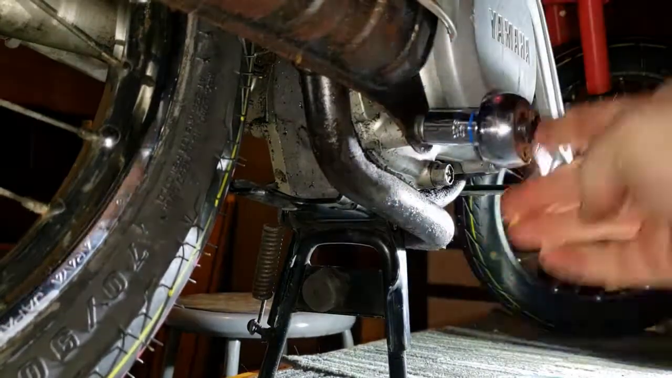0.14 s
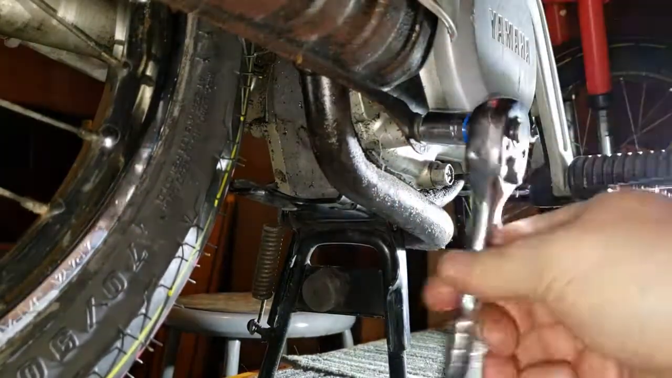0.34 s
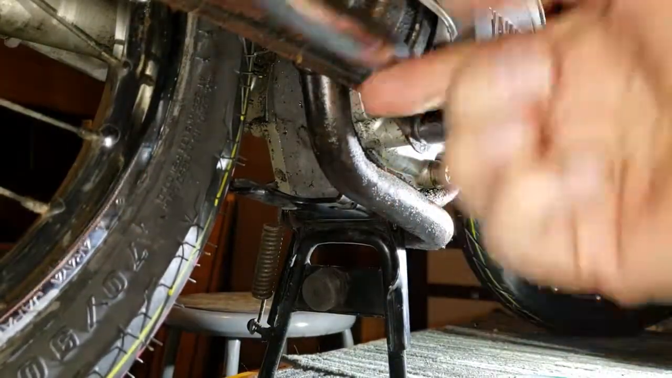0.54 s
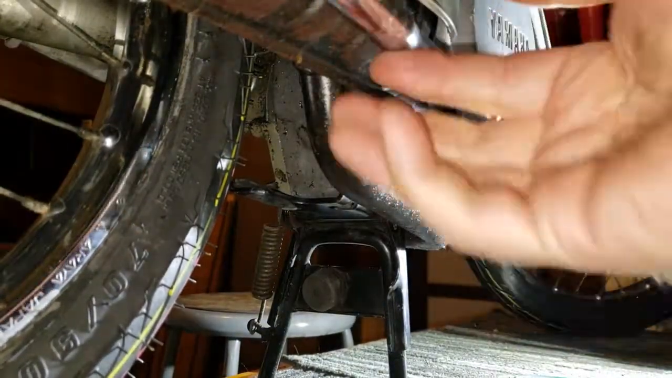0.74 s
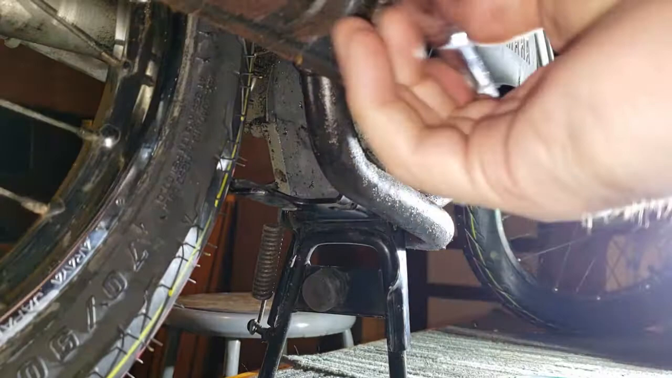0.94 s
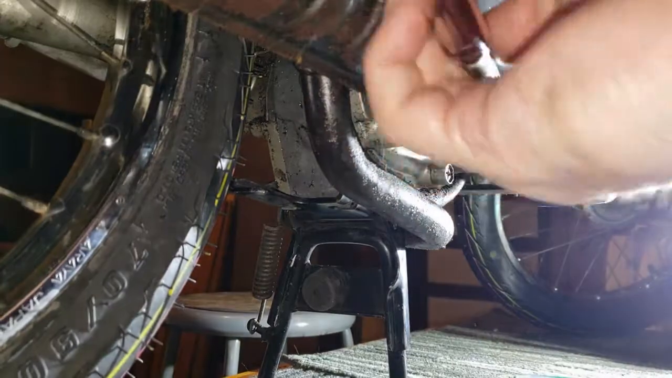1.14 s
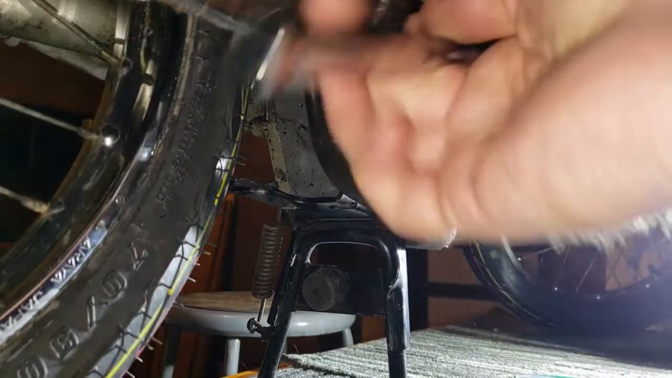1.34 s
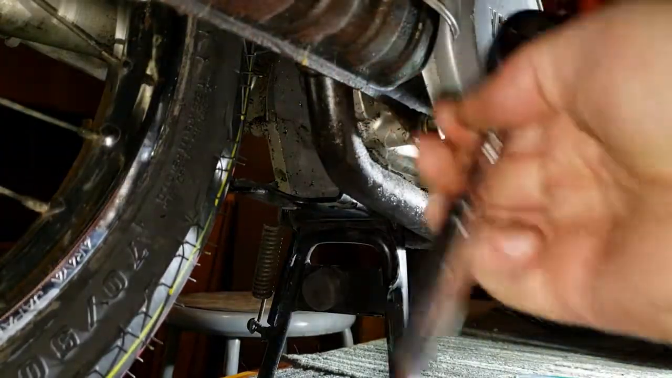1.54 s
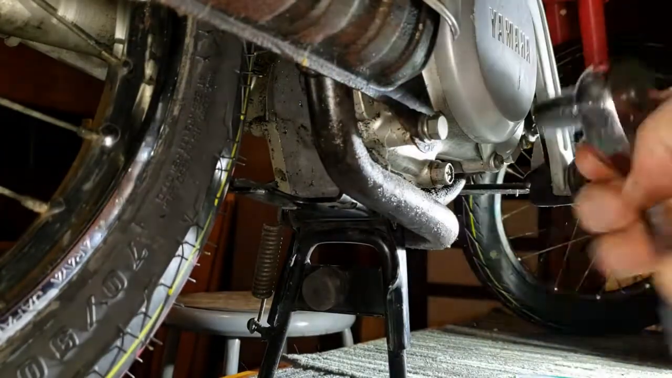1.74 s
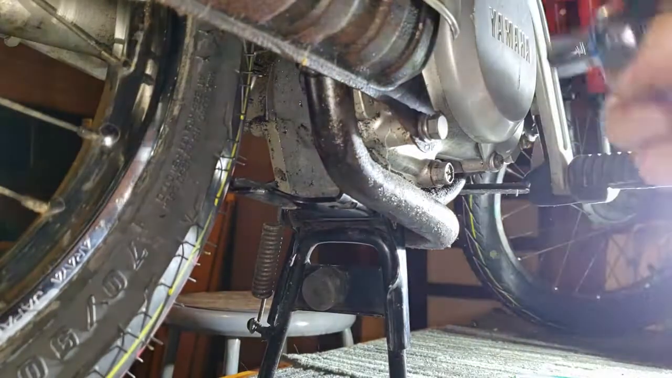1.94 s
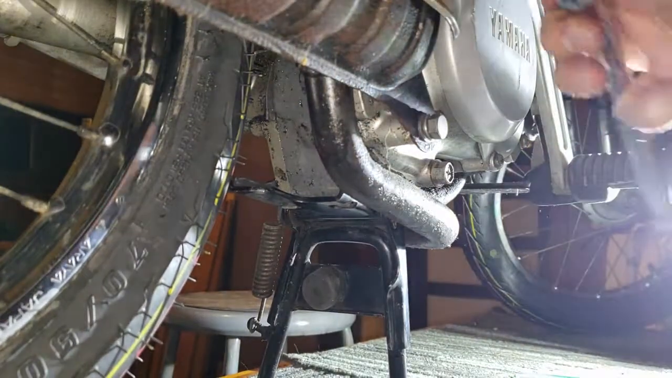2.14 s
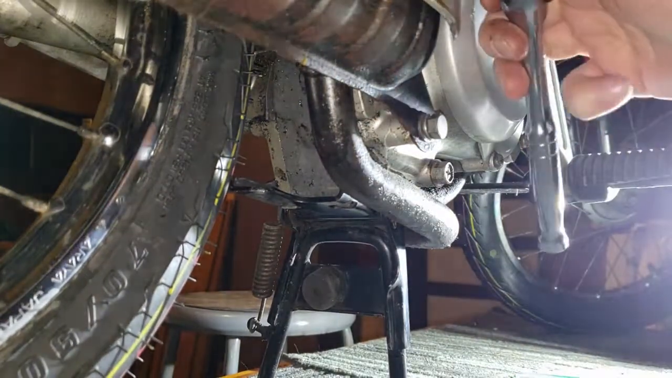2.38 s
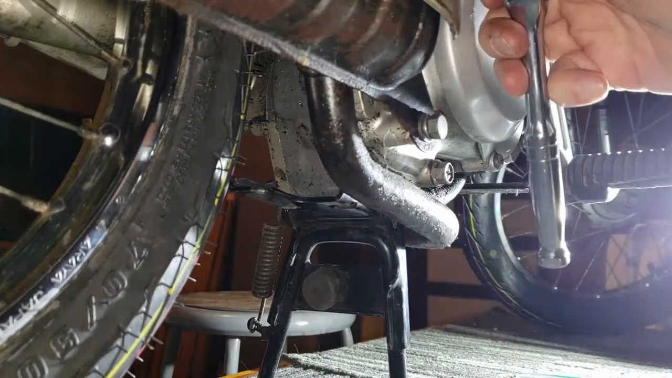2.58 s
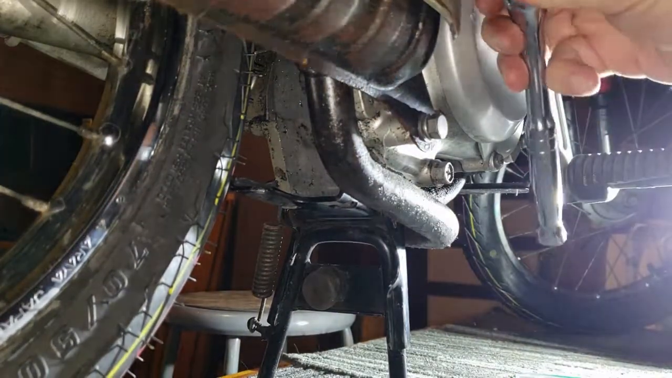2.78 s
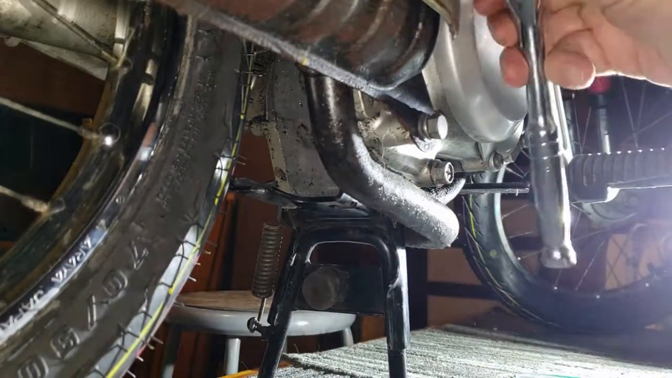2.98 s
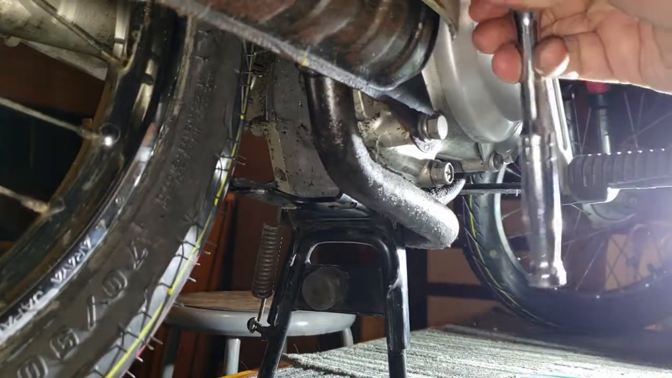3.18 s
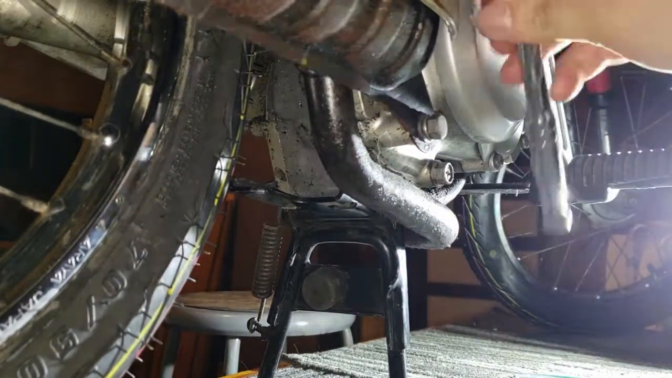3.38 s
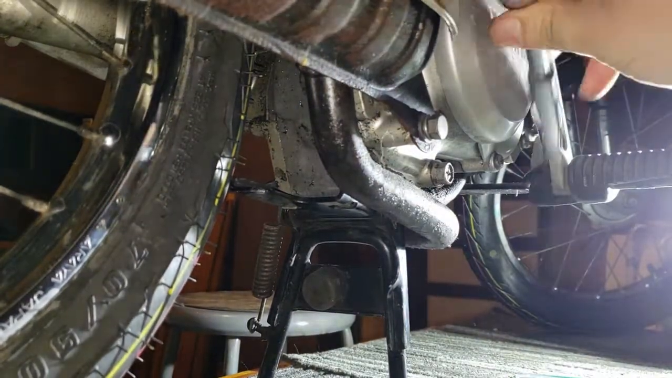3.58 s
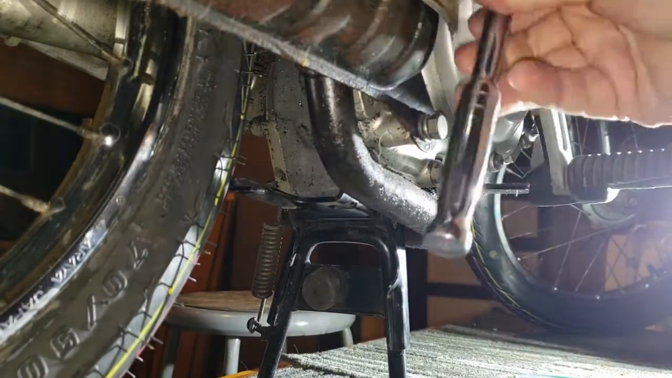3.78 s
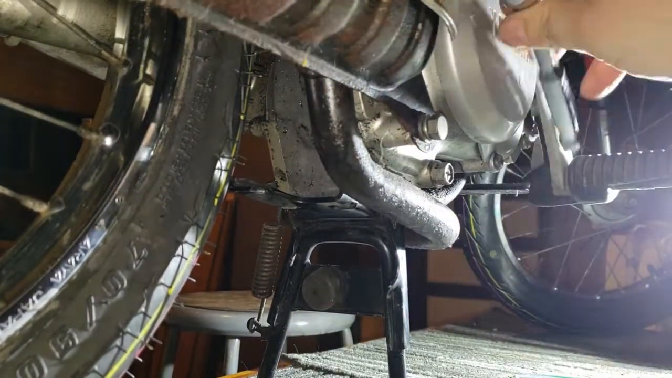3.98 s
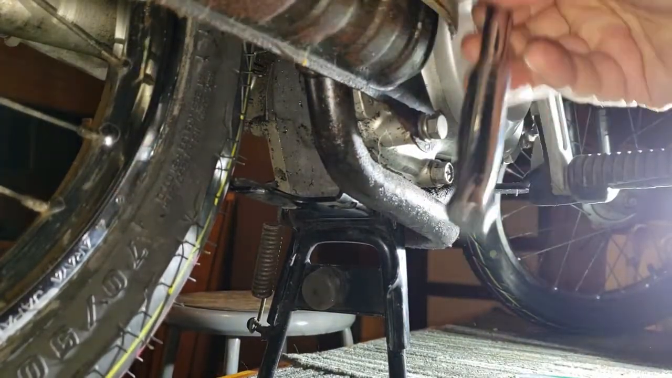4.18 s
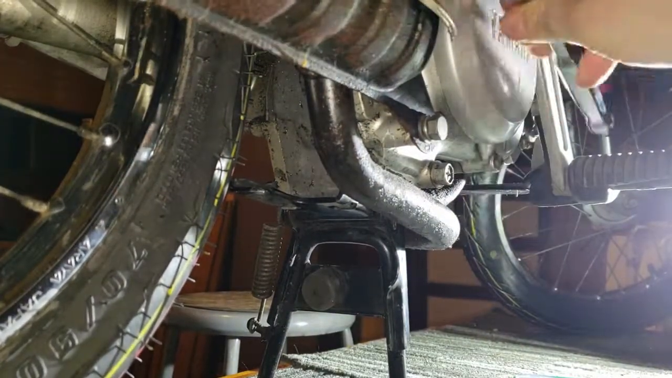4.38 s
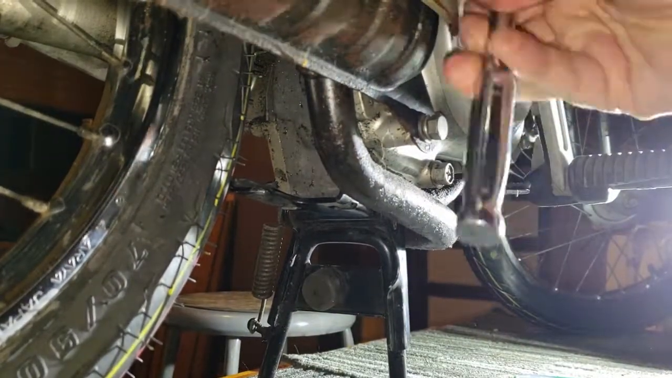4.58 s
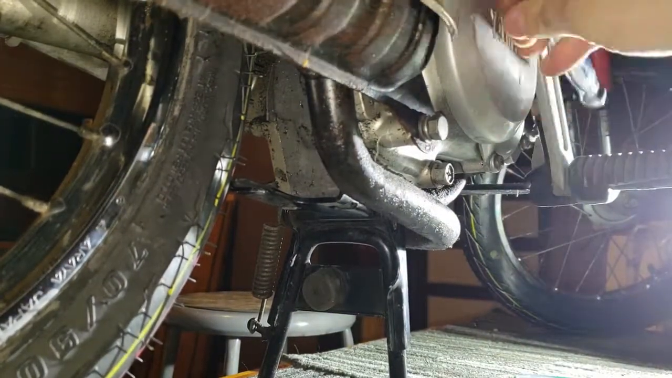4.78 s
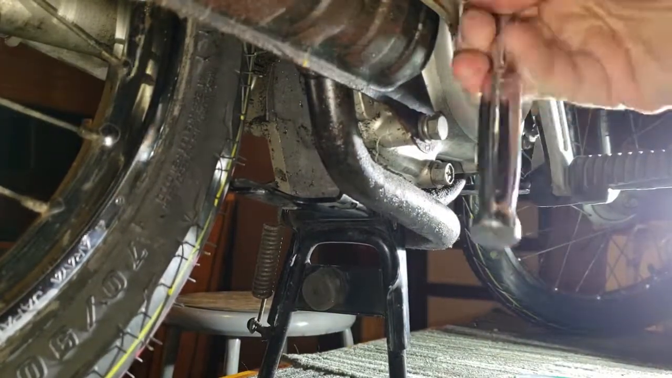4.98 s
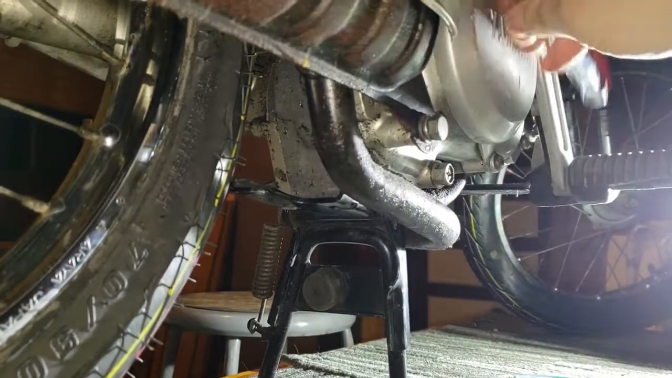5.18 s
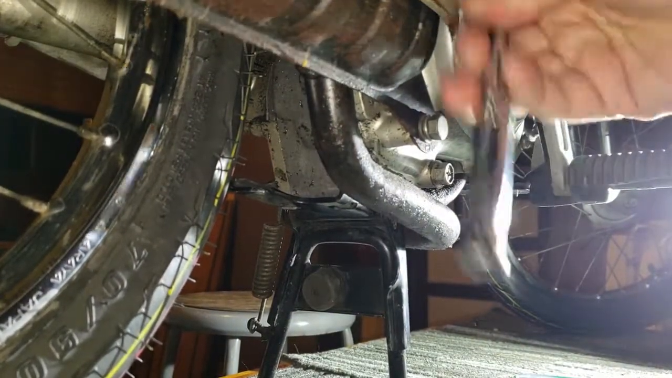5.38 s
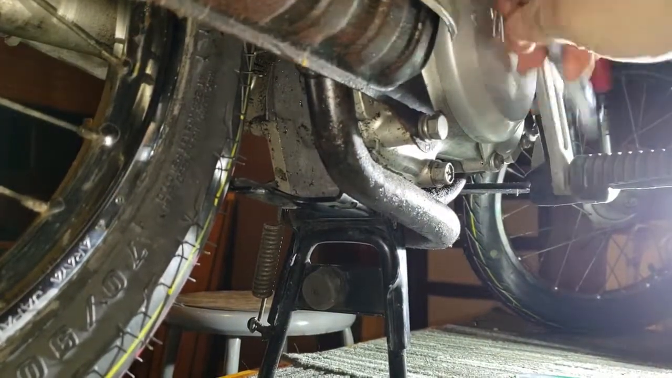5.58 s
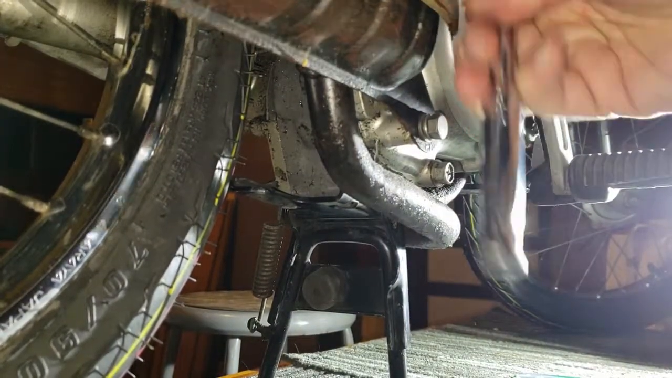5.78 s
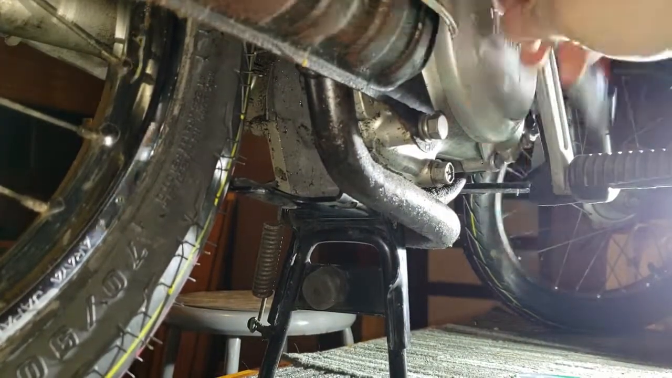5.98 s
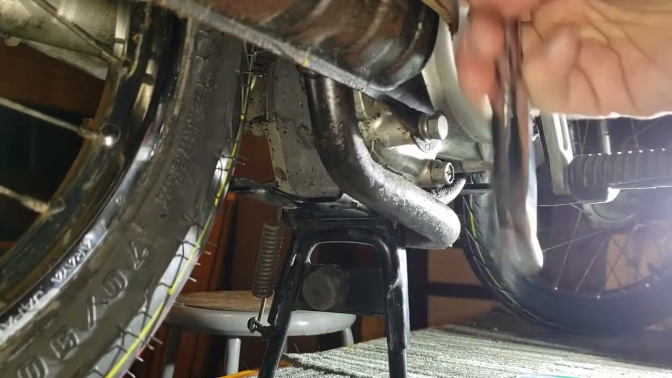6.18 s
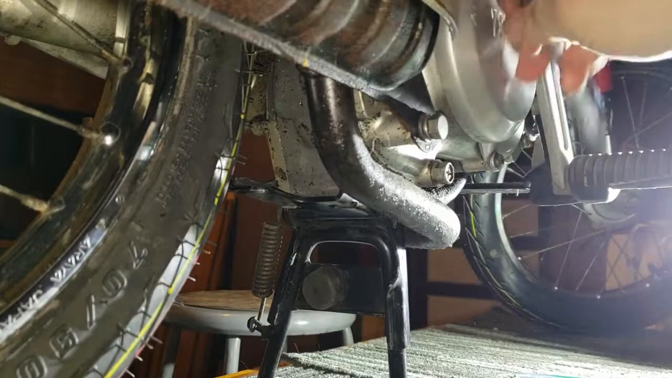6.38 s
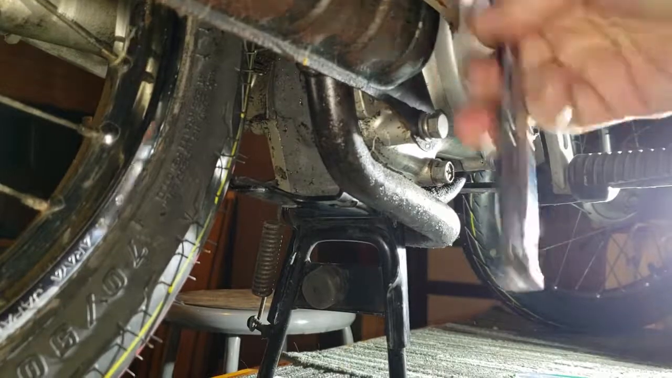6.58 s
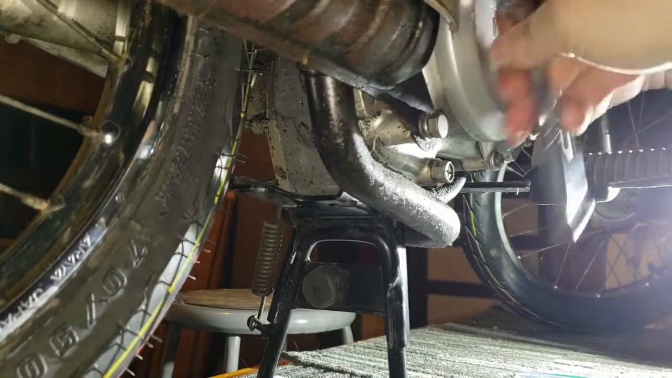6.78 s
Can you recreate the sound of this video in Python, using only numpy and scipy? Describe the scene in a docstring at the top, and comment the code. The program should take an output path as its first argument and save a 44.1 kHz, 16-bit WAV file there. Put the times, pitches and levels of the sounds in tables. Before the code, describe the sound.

Soft rumble and a low unsteady hum fill a small, briefly echoing room. First comes a tight cluster of hard metallic knocks, then a bright steel clank. After a few socket ticks and rubbing hisses, a lone ratchet click sounds, followed by nine crisp, evenly repeated clicking swings, close to the microphone, with one dull thud among them.

```python
"""Metal clatters against a moped in a small home workshop, over the room's rumble and a faint wavering hum.
A socket is rammed onto a ratchet with a clank; one lone click and nine bursts of clicking back-swings follow.
Rubbing hisses come from hand and pawl, and the socket ticks in its play on an engine bolt.
Contacts are short bursts of coloured noise, most with decaying modes of the struck metal under them.
Hum and drone are sines, rumble and rubbing are filtered noise, and an echo of noise is the room."""
import sys
import numpy as np
from scipy import signal
from scipy.fft import rfft, irfft, next_fast_len
from scipy.io import wavfile
from scipy.ndimage import uniform_filter1d

SR = 44100
rng = np.random.default_rng(int(sys.argv[2]) if len(sys.argv) > 2 else 0)


def persist_wave(psi):
    """Save psi, clipped to +-1, as 16-bit WAV."""
    counts = np.round(np.clip(psi, -1, 1) * 32767).astype(np.int16)
    wavfile.write(sys.argv[1], SR, np.atleast_2d(counts).T)


N = 301203


def from_db(db):
    """Decibels to gain."""
    return 10 ** (np.asarray(db) / 20)


def rms_one(x):
    """Scale to unit rms."""
    return x / np.sqrt(np.mean(x ** 2) + 1e-20)


def in_time(rows):
    """Each column of a curve at every sample."""
    s, *columns = np.transpose(rows)
    return [np.interp(np.arange(N) / SR, s, c) for c in columns]


def at_hz(points, hz, axis=1):
    """Read a column of a spectrum on a log-frequency axis."""
    points = np.array(points)
    return np.interp(np.log(hz + 1), np.log(points[:, 0]), points[:, axis])


def bins(size):
    """Frequencies of a spectrum of this many samples."""
    return np.arange(size // 2 + 1) * SR / size


def shelf(hz, corner_hz):
    """Smooth step in frequency: 0 well below the corner, 1 well above."""
    return hz ** 4 / (hz ** 4 + corner_hz ** 4)


def noise(level_db, size, alike=0, lag_ms=0):
    """Coloured stereo noise of unit rms; its shared part reaches the right ear lag_ms later."""
    shared, *own = rfft(rng.standard_normal((3, size)))
    delay = np.exp(-2j * np.pi * bins(size) * np.array([[0], [lag_ms]]) / 1000)
    both_ears = np.sqrt(alike) * shared * delay
    each_ear = np.sqrt(1 - alike) * np.array(own)
    return rms_one(irfft((both_ears + each_ear) * from_db(level_db), size))


def ripple(size, count=40):
    """Random hills and valleys in a spectrum, in dB, so that each contact has its own tone."""
    knots_hz = np.linspace(0, SR / 2, count)
    return 2.5 * np.interp(bins(size), knots_hz, rng.standard_normal(count))


def blow(size, rise, t60):
    """Envelope of a contact: fast rise, exponential fall by 60 dB in t60 seconds."""
    t = np.arange(size) / SR
    return (1 - np.exp(-t / rise)) * np.exp(-np.log(1000) * t / t60)


SCATTER_DB = 1.8   # spread of each mode's strength from blow to blow


def ringing(modes, size, detune=0):
    """Struck modes with new strengths each blow, optional random detuning and a phase for each ear."""
    hz, level_db, t60 = np.transpose(modes)[:, :, None]
    t = np.arange(size) / SR
    hz = hz * (1 + detune * rng.standard_normal(hz.shape))
    strength = from_db(level_db + SCATTER_DB * rng.standard_normal(hz.shape))
    decay = strength * np.exp(-np.log(1000) * t / t60)
    # long waves reach both ears in step
    apart = 0.29 * shelf(hz.T, 900) * rng.standard_normal((2, len(hz)))
    phase = np.exp(2j * np.pi * (rng.random(len(hz)) + apart))
    modes_sum = (phase @ (decay * np.exp(2j * np.pi * hz * t))).real
    return modes_sum * (1 - np.exp(-t / 0.0002))


def add(out, s, sound):
    """Mix a sound in at time s."""
    i = round(s * SR)
    out[:, i:i + sound.shape[1]] += sound[:, :max(N - i, 0)]


def pan(db):
    """Gains for a left-minus-right level difference."""
    return from_db(np.array([[db], [-db]]) / 2)


# rumble's movement, before trim: [t/s, deep level/dB, upper level/dB]
RUMBLE_MOVES = [(0, -53, -54), (.5, -56.5, -55), (1.05, -60, -58), (1.9, -64.5, -59), (2.4, -64, -59),
                (2.9, -56.5, -55.5), (3.15, -57, -52.5), (4.35, -56.5, -57), (5.25, -59.5, -57.5),
                (6.83, -55.5, -56)]
# rumble's colour: [f/Hz, relative level/dB]
RUMBLE_COLOUR = [(22, -30), (40, -11), (90, -10.5), (160, -3), (260, -5), (449, -8), (640, -2.5),
                 (720, -10.5), (866, -9.5), (1050, -14), (1720, -23.5), (3310, -28), (6500, -35.5),
                 (16000, -37.5)]
# resonances in the rumble: [f/Hz, width/Hz, boost level/dB]
AIR_PEAKS = [(256, 30, 4.5), (546, 44, 2.5), (649.4, 98, 5)]
# left-right likeness of rumble and echo: [f/Hz, shared power 0-1]
LIKENESS = [(50, 0.76), (150, 0.97), (300, 0.82), (600, 0.45), (1200, 0), (16000, 0)]
# wavering hum: [t/s, f/Hz, rms level/dB]
HUM = [(0, 57.3, -66), (.6, 58.7, -61.5), (1.1, 52, -63), (3.2, 52.13, -62), (3.5, 55.7, -60.5),
       (3.9, 56.9, -68), (4.8, 59.9, -68), (5.35, 63, -63), (6.83, 65, -58.5)]
# steady drone: [f/Hz, rms level/dB]
DRONE = [(118, -77), (146, -77.5), (207, -73.5), (241, -66.5), (267, -81.5)]


def background():
    """Rumble with a few resonances, a steady drone and a low hum that wavers in pitch."""
    size = next_fast_len(N)
    hz, t = bins(size), np.arange(N) / SR
    colour = at_hz(RUMBLE_COLOUR, hz)
    for centre, width, boost_db in AIR_PEAKS:
        colour = colour + boost_db / (1 + (2 * (hz - centre) / width) ** 2)
    upper = shelf(hz, 330)
    rumble = 0
    for share, level_db, trim_db in zip((1 - upper, upper), in_time(RUMBLE_MOVES), (2.0, 2.5)):
        part = noise(colour + 10 * np.log10(share + 1e-9), size, alike=at_hz(LIKENESS, hz))
        rumble = rumble + part[:, :N] * from_db(level_db + trim_db)
    hum_hz, hum_db = in_time(HUM)
    hum = from_db(hum_db) * np.sin(2 * np.pi * np.cumsum(hum_hz) / SR)
    drone = sum(from_db(db) * np.sin(2 * np.pi * (line_hz * t + rng.random())) for line_hz, db in DRONE)
    return rumble * pan(.8) + np.sqrt(2) * (hum + drone)   # root two turns rms into sine peak


# workshop's echo by band: [f/Hz, level/dB, t60/s]
ECHO_BANDS = [(100, 1, 0.9), (250.5, 5, 0.42), (620, 2.5, 0.28), (1510, -5.5, 0.39), (4020, -5, 0.27),
              (9350, -14, .27), (15000, -10.5, .19)]


def workshop(dry, size=24000):
    """Dense echo of diffuse noise whose bass lingers longest and whose top dies first."""
    hz, echo = bins(size), 0
    diffuse = rfft(noise(0 * hz, size, alike=at_hz(LIKENESS, hz)))
    centres = np.array(ECHO_BANDS)[:, 0]
    for (_, level_db, t60), pick in zip(ECHO_BANDS, np.eye(len(ECHO_BANDS))):
        # each band fades into its neighbours
        band = irfft(diffuse * at_hz(np.c_[centres, pick], hz), size)
        tail = blow(size, rise=0.0035, t60=t60)
        echo = echo + from_db(level_db) * band * tail / np.linalg.norm(tail)
    return signal.fftconvolve(dry, echo, axes=1)[:, :N]


# rubbing hisses: hand on the tool, and the pawl's slow ride up a tooth before the lone click:
# [start t/s, end t/s, base level/dB]
RUBS = [(1.416, 1.473, -53), (1.976, 2.169, -63.5), (2.771, 2.931, -52), (2.941, 3.091, -57.5),
        (3.099, 3.183, -50.5)]
# hiss of rubbing: [f/Hz, relative level/dB]
RUB_COLOUR = [(400, -14), (1200, -2), (2400, -0.5), (5000, -4), (8000, -1.5), (13000, 3), (16000, -1.5)]
# the hand slides on the handle once shortly before each of the last swings: [base level/dB]
REGRIPS = [-55, -45, -50, -46, -44.5]
REGRIP_LEAD_S, REGRIP_S = 0.1, .062   # start ahead of the swing, length


def rubbing():
    """Surfaces rub, hand on tool or pawl on tooth: a soft hiss swells and fades, catching in tiny slips."""
    out = np.zeros((2, N))
    rubs = list(RUBS)
    for (swing_s, *_), level_db in zip(SWINGS[-len(REGRIPS):], REGRIPS):
        start = swing_s - REGRIP_LEAD_S
        rubs.append((start, start + REGRIP_S, level_db))
    for start, end, level_db in rubs:
        size = round((end - start) * SR)
        grain = rms_one(uniform_filter1d(rng.standard_normal(size), size=300))
        slips = (rng.random(size) < 70 / SR) * rng.random(size)   # about 70 a second
        catch = signal.fftconvolve(slips, blow(size, rise=0.000179, t60=0.018))[:size]
        swell = signal.windows.tukey(size, .7) * from_db(level_db + 1.2 * grain)
        hiss = noise(at_hz(RUB_COLOUR, bins(size)), size, alike=0.18)
        add(out, start, swell * (1 + 1.1 * catch) * hiss)
    return out * pan(-1.5)


# socket ticking in its play on the bolt: [t/s, level/dB before trim, treble level/dB relative]
TICKS = [(0.0356, -40.5, -28), (0.3106, -43, -27), (0.5276, -46, -49), (1.0253, -46, 1),
         (2.4607, -23.5, -3), (2.4843, -29.5, -21), (2.5825, -41, -40), (2.6553, -40.5, -37),
         (3.6634, -26, -44), (3.7395, -28.5, -28), (4.9704, -27.5, -3), (5.3535, -29, -18),
         (5.74, -33.5, -15), (6.2906, -33, -12), (6.6339, -35, -43), (6.6622, -36, -5)]
# tick's colour: [f/Hz, relative level/dB]
TICK_COLOUR = [(530, -46.5), (900, -12.5), (2120, -5.5), (3590, -9.5), (4150, -1.5), (7770, -4.5),
               (8550, -15), (9650, -13), (16000, -3)]
# modes of the ratchet head, also rung by its teeth: [f/Hz, relative level/dB, t60/s]
HEAD = [(1436, -29.5, 0.07), (2128, -24.5, 0.057), (2399, -21.5, 0.026), (4840, -18, 0.085),
        (5244, -15.5, 0.023), (9804, -6.5, 0.062), (9750, -14, 0.03), (15300, -12, 0.013)]


def ticks(size=4096):
    """Light steel-on-steel contacts: noise bursts with a trace of the head's ring."""
    out, hz = np.zeros((2, N)), bins(size)
    for s, level_db, treble_db in TICKS:
        colour = at_hz(TICK_COLOUR, hz) + treble_db * shelf(hz, 7700)
        tick = noise(colour, size, alike=0.3) * blow(size, rise=0.0009, t60=0.026)
        add(out, s, from_db(level_db - 4.5) * tick + from_db(level_db - 21.0) * ringing(HEAD, size))
    return out


# handle bumping its stop, one event: [t/s, level/dB]
BUMP = (3.8258, -30.5)
# dull colour of the thud: [f/Hz, relative level/dB]
THUD_COLOUR = [(60, -9), (190, 2), (300, -5), (430, -6), (590, 3), (880, -18), (1170, 6.5), (1400, -19.5),
               (2500, -16.5), (6000, -29.5), (16000, -52)]


def bump(size=8192):
    """The hand bumps the handle against its stop: a soft thud of dull, short-lived noise."""
    out = np.zeros((2, N))
    s, level_db = BUMP
    thud = noise(at_hz(THUD_COLOUR, bins(size)), size, alike=0.75) * blow(size, rise=0.00022, t60=0.076)
    add(out, s, from_db(level_db) * thud)
    return out


# tool knocking the moped:
# [t/s, level/dB before trim, bass level/dB, treble level/dB, crack t60/s, left-minus-right level/dB]
# the colour is left as it is by bass -15.5 and treble -10.5
KNOCKS = [(0.695, -6.5, -16, -10.5, 0.044, -2.5), (0.726, -6, -20, -18.5, 0.035, 3.5),
          (0.738, -4.5, -26, -10, 0.047, -1), (0.754, -12, -20.5, -6, 0.042, 1.0),
          (0.767, -16.5, -17, -7, 0.047, 4), (0.938, -31, -29, -21, 0.042, 1.5),
          (0.951, -41, -16.5, -18.5, 0.042, -8)]
# crack's colour: [f/Hz, relative level/dB]
KNOCK_COLOUR = [(35, -54.5), (60, -24), (139, -15), (417, -12), (458, -8.5), (540, -13.5), (1220, -6),
                (1470, -15), (2300, -3), (3040, -8.5), (4320, -8), (5090, -12.5), (6740, -14.5),
                (8920, -22), (16000, -16.5)]
# ring of the knocked metal: [f/Hz, relative level/dB, t60/s]
FRAME = [(125, -31.5, 0.15), (173, -22.5, 0.18), (392, -30, 0.27), (998, -25, 0.18), (1181, -21.5, .3),
         (1846, -21, .12), (2070, -29, .2), (2340, -20.5, 0.17), (2540, -18.5, 0.27), (2660, -24, 0.33),
         (2983, -27, 0.26), (3210, -26.5, .3), (3440, -21, .15), (3650, -27.5, .35), (4350, -19, 0.13),
         (4900, -20.5, 0.16), (7810, -28.5, 0.2)]


def knocks(size=16384):
    """The tool clatters: hard cracks with their own bass and treble, and the ring of frame and exhaust."""
    out, hz = np.zeros((2, N)), bins(size)
    for s, level_db, bass_db, treble_db, t60, side_db in KNOCKS:
        bass = (bass_db + 15.5) * (1 - shelf(hz, 1400))
        treble = (treble_db + 10.5) * shelf(hz, 4000)
        colour = at_hz(KNOCK_COLOUR, hz) + bass + treble
        crack = noise(colour, size, alike=1 - .5 * shelf(hz, 540), lag_ms=-.13)
        tail = from_db(-13.5) * blow(size, rise=.003, t60=0.14)
        crack = crack * (blow(size, rise=0.00052, t60=t60) + tail)
        ring = ringing(FRAME, size)
        add(out, s, pan(side_db) * (from_db(level_db - 2.5) * crack + from_db(level_db - 8.0) * ring))
    return out


# socket rammed home on the ratchet: [t/s, level/dB before trim, crack t60/s]
CLANKS = [(1.4962, -27.5, 0.015), (1.499, -7, 0.013), (1.5018, -10, 0.02)]
# crack's colour: [f/Hz, relative level/dB]
CLANK_COLOUR = [(100, -33), (500, -15), (850, -7.5), (1100, -5), (1350, -2.5), (1650, -0.5), (2500, 2.5),
                (3200, -12), (4500, -5), (5400, -6.5), (6000, -8.5), (8000, -13), (12000, -9.5),
                (16000, -11)]
# modes of socket and handle: [f/Hz, relative level/dB, t60/s]
SOCKET = [(130, -34, .3), (237.5, -30.5, 0.11), (290, -30.5, 0.24), (825, -37.5, .3), (1123, -12, 0.13),
          (1560, -13, 0.045), (1670, -27, 0.3), (1920, -9.5, 0.06), (2500, -15.5, 0.042), (4930, -24, 0.19),
          (5930, -9, .03), (9440, -16.5, 0.11), (9880, -23, 0.074)]


def clank(size=16384):
    """The socket touches, slams against its shoulder and rebounds: three cracks, each with a ring."""
    out, hz = np.zeros((2, N)), bins(size)
    for s, level_db, t60 in CLANKS:
        crack = noise(at_hz(CLANK_COLOUR, hz), size, alike=0.22, lag_ms=.27)
        crack = crack * blow(size, rise=0.00065, t60=t60)
        add(out, s, from_db(level_db + 3.0) * crack + from_db(level_db - 7.5) * ringing(SOCKET, size))
    return out * pan(3.0)


# a lone click, then back-swings of the handle:
# [start t/s, end t/s, teeth passed, arc share at first tooth 0-1, arc share at last tooth 0-1,
#  base level/dB, head's ring level/dB relative]
SWINGS = [(2.9, 2.9, 1, 0.25, .9, -14, -5), (3.4846, 3.645, 10, 0.11, 0.96, -11, -4),
          (4.0059, 4.137, 11, 0.43, 0.85, -10, -7), (4.3901, 4.508, 10, .46, 0.96, -10.5, -6),
          (4.783, 4.909, 11, 0.31, .88, -11.5, -3), (5.1761, 5.309, 11, 0.08, .98, -10.5, -5),
          (5.549, 5.679, 10, .16, .96, -11.5, -5), (5.9355, 6.0885, 13, 0.45, 0.84, -12.5, -4),
          (6.3047, 6.4438, 13, 0.13, 0.82, -12, 1), (6.6831, 6.821, 10, .08, .97, -10.5, -1)]
SLOW_LOSS_DB = 3.5    # most a tooth loses when passed at a crawl
FIRST_LOSS_DB = 2.5   # the pawl meets its first tooth only half loaded
TOOTH_SCATTER_DB, RING_SCATTER_DB, TOOTH_JITTER_S = 1.57, 3.0, .0003   # from tooth to tooth


def teeth():
    """Evenly spaced teeth on a pendulum swing crowd in mid-arc; rows of (s, gap s, level dB, ring dB)."""
    rows = []
    for start, end, count, first, last, base_db, ring_db in SWINGS:
        arc = np.linspace(first, last, count)
        phase = np.arccos(1 - 2 * arc)   # the sine of this is the hand's speed
        late, strength, ring = rng.standard_normal((count, 3)).T
        progress = (phase - phase[0]) / (np.ptp(phase) + 1e-9)
        s = start + (end - start) * progress + TOOTH_JITTER_S * late
        gap = np.diff(s, append=np.inf)
        level_db = base_db - SLOW_LOSS_DB * (1 - np.sin(phase)) - FIRST_LOSS_DB * (arc == arc[0])
        snap_db = level_db + TOOTH_SCATTER_DB * strength
        head_db = level_db + ring_db + RING_SCATTER_DB * ring
        rows += zip(s, gap, snap_db, head_db)
    return rows


# colour of the pawl's snap: [f/Hz, relative level/dB]
SNAP_COLOUR = [(300, -22.5), (700, -14.5), (1000, -14.5), (1500, -8), (2300, -6), (3200, -7.5),
               (4500, -0.5), (6000, -4), (8000, -5), (11000, -2), (12400, 1), (13700, -2.5), (15300, 9.5),
               (16500, 11)]
SNAP_RISE_S, SNAP_HOLD_S, SNAP_T60_S, SNAP_DB = 0.0015, 0.0037, 0.019, -1.5   # hold ends at this time
SLIP_S, SLIP_DB = .0025, -15.5   # the slip over the crest starts this early and peaks with the snap
BOUNCE_S, BOUNCE_SPREAD_S, BOUNCE_DB = .0015, .002, -9   # second landing: least delay, random extra
RASP_GAP_S, RASP_FADE_S, RASP_DB = 0.016, .005, -8   # rasp fades in as teeth come closer than the gap
RING_RISE_S = 0.0011


def ratchet(size=3072):
    """Each tooth: the pawl slips over the crest, snaps down, bounces and sets the head ringing."""
    out, hz, t = np.zeros((2, N)), bins(size), np.arange(size) / SR
    # the treble favours the right side
    colour = at_hz(SNAP_COLOUR, hz) + np.array([[-1], [1]]) * shelf(hz, 4500)
    settle = np.exp(-np.log(1000) * np.maximum(t - SNAP_HOLD_S, 0) / SNAP_T60_S)
    drop = np.minimum(t / SNAP_RISE_S, 1) * settle
    crest = np.interp(t / SLIP_S, [0, 1, 2], [0, 1, 0]) ** 2
    landing = blow(size, rise=0.00084, t60=0.017)
    ring_rise = np.minimum(t / RING_RISE_S, 1)
    for s, gap, level_db, ring_db in teeth():
        when, strength = rng.random(2)
        snap, bounce, rasp = (noise(colour + ripple(size), size, alike=0.35, lag_ms=-0.054)
                              for _ in range(3))
        add(out, s - SLIP_S, from_db(level_db + SLIP_DB) * crest * bounce)
        add(out, s, from_db(level_db + SNAP_DB) * snap * drop)
        bounce_s = s + BOUNCE_S + BOUNCE_SPREAD_S * when
        add(out, bounce_s, from_db(level_db + BOUNCE_DB) * strength * bounce * landing)
        ring = ring_rise * ringing(HEAD, size, detune=0.0029)
        add(out, s, from_db(ring_db) * pan(-4.0) * ring)
        # only on a fast swing does the pawl rasp up the flank towards the next tooth
        speed = np.clip((RASP_GAP_S - gap) / RASP_FADE_S, 0, 1)
        flank = np.sin(np.pi * np.clip(t / max(gap, .002), 0, 1))
        add(out, s + .002, from_db(level_db + RASP_DB) * speed * flank * rasp)
    return out * pan(-0.36)


def scene():
    """Handling, clatter and clank sound directly and feed one echo, over the background."""
    handling = ratchet() + ticks() + rubbing()
    clatter = knocks() + bump()
    rammed = clank()
    echo = workshop(from_db(-2.5) * handling + from_db(-4.5) * (clatter + rammed))
    return handling + clatter + rammed + echo + background()


CUTOFF_HZ = 15750


def record(dry):
    """Soft saturation rounds the highest peaks, then a steep low-pass cuts the top."""
    low_pass = signal.ellip(10, .2, 70, CUTOFF_HZ, fs=SR, output="sos")
    return signal.sosfilt(low_pass, np.tanh(dry))


dry = scene()
out = record(dry)
persist_wave(out)
```